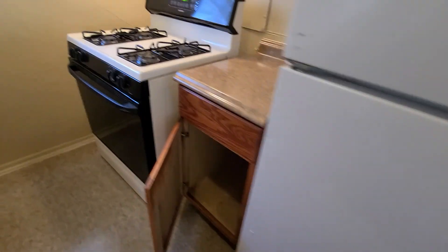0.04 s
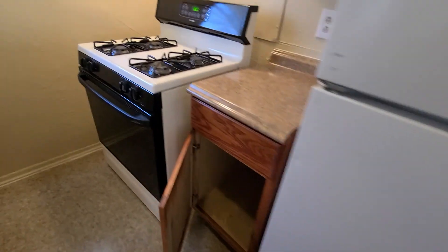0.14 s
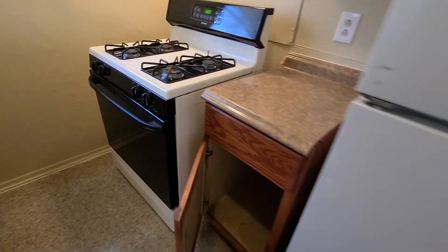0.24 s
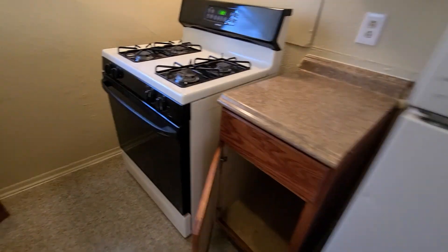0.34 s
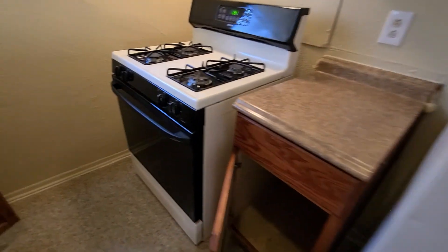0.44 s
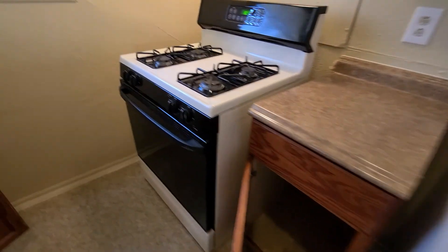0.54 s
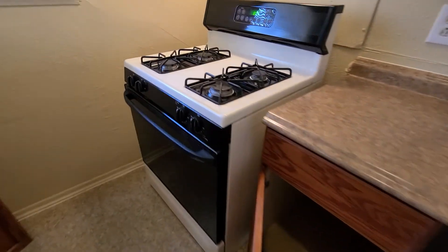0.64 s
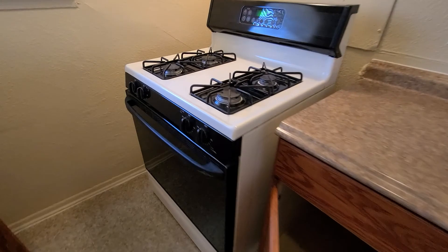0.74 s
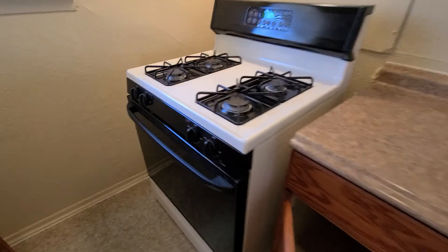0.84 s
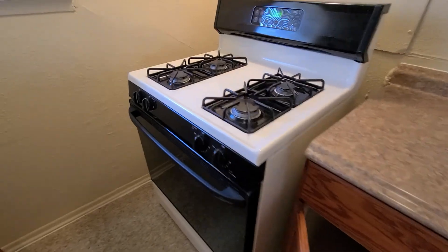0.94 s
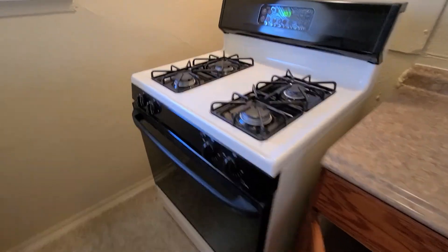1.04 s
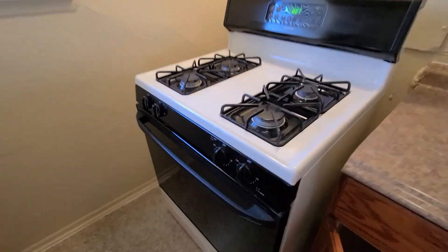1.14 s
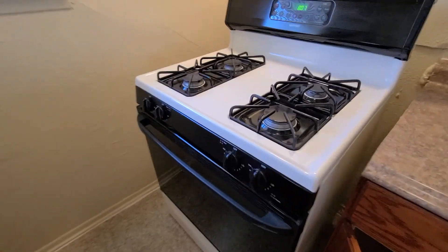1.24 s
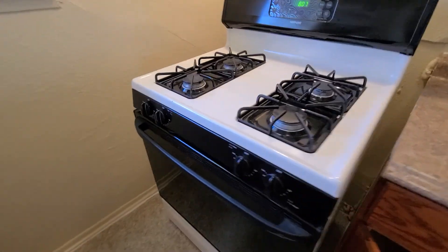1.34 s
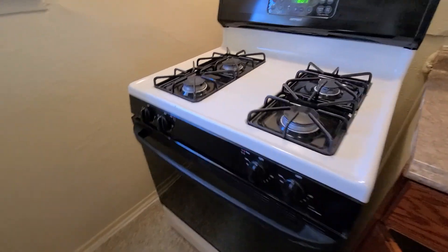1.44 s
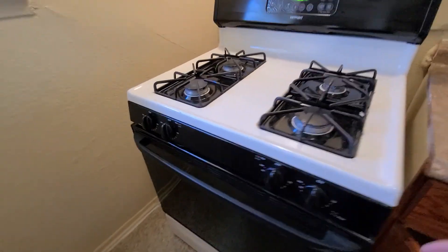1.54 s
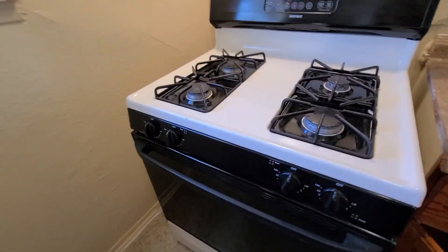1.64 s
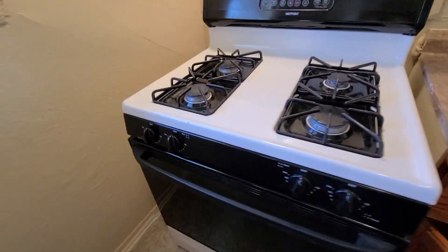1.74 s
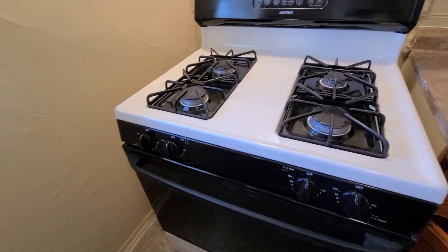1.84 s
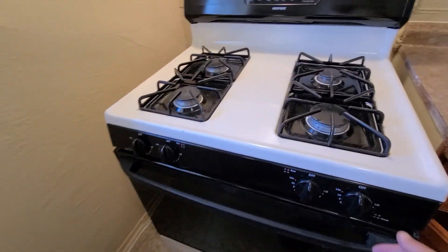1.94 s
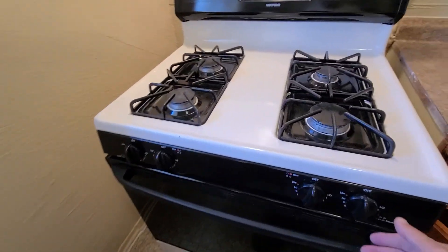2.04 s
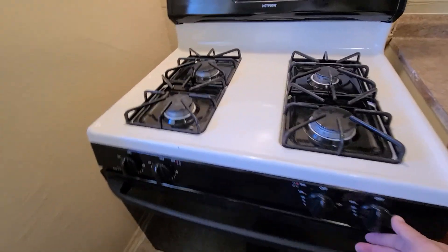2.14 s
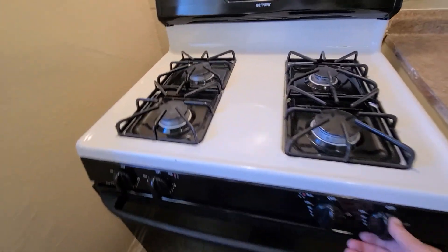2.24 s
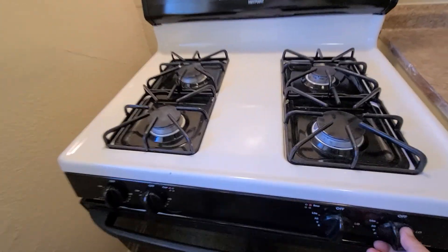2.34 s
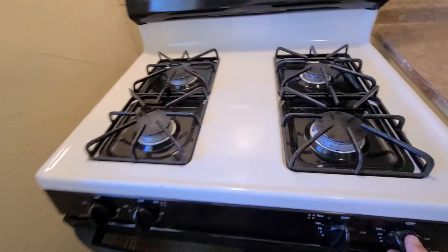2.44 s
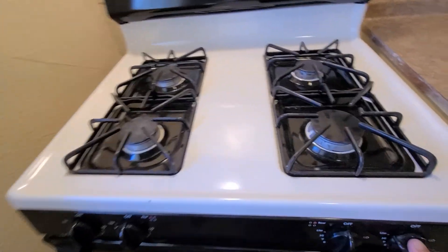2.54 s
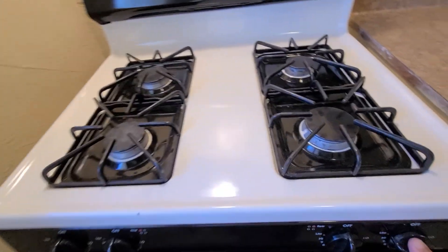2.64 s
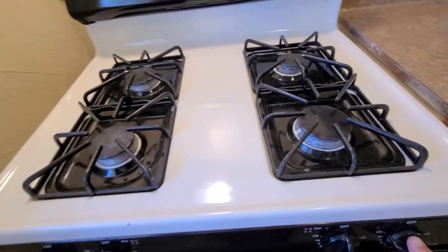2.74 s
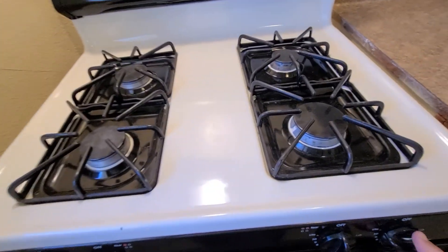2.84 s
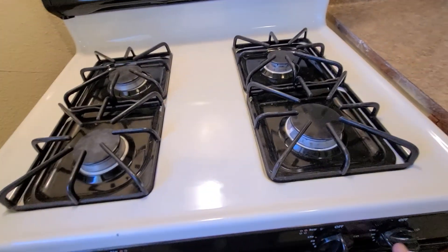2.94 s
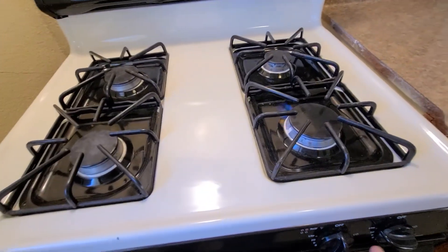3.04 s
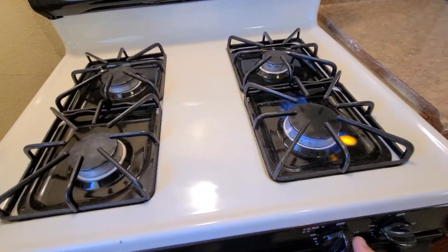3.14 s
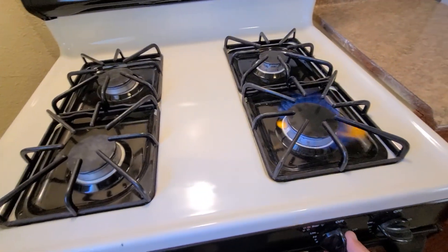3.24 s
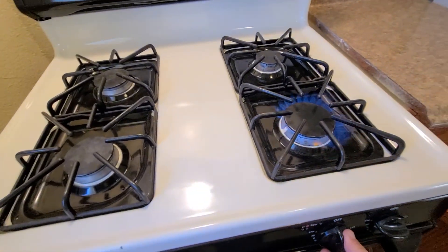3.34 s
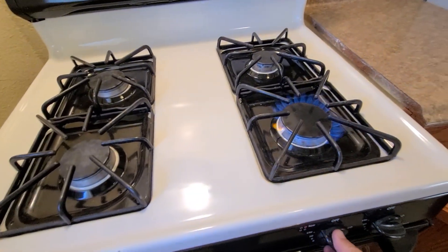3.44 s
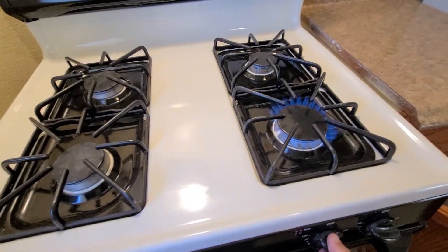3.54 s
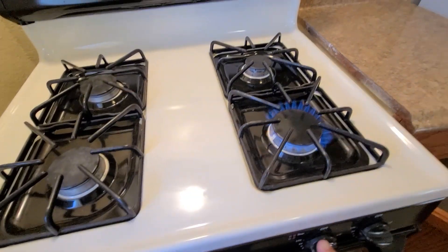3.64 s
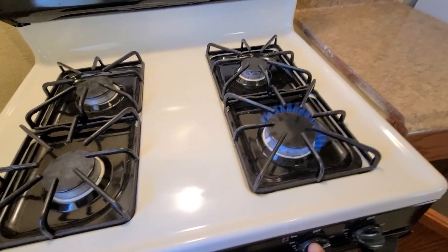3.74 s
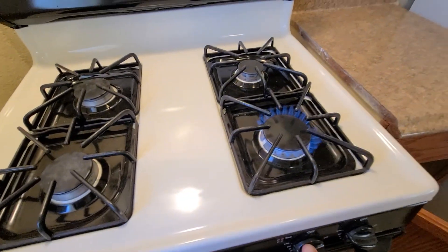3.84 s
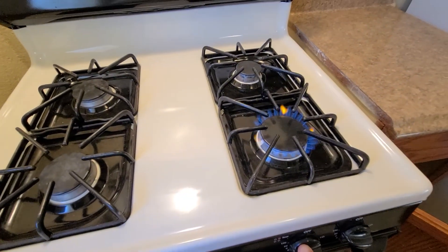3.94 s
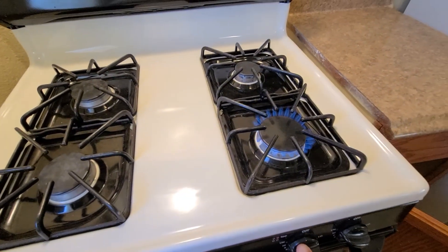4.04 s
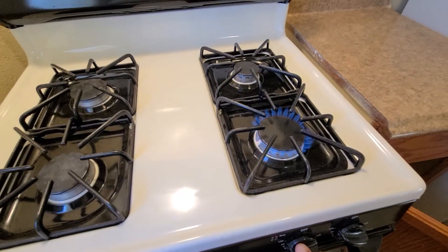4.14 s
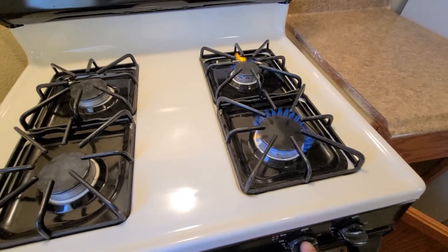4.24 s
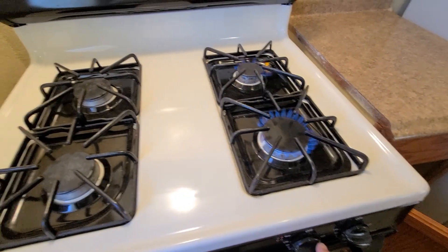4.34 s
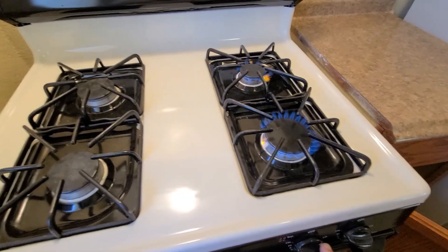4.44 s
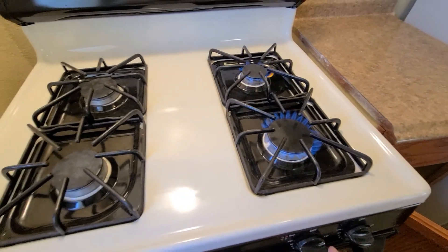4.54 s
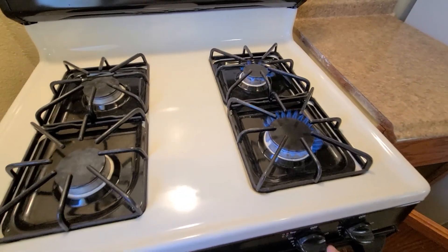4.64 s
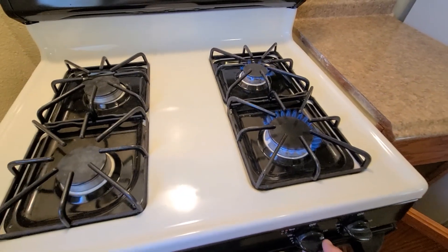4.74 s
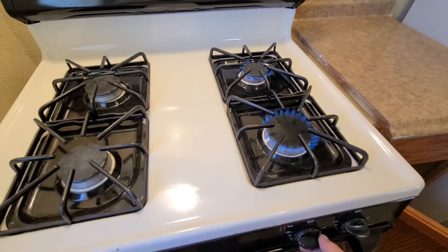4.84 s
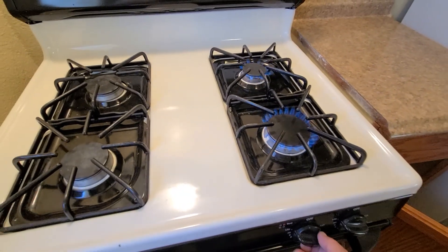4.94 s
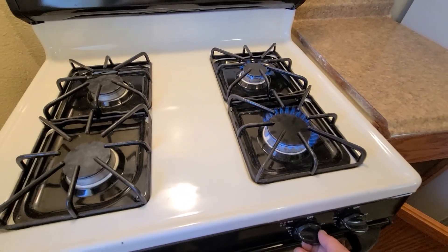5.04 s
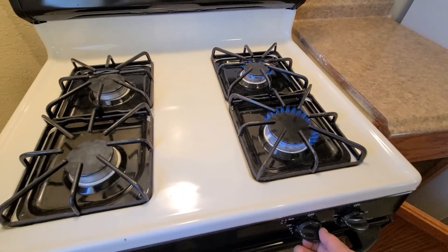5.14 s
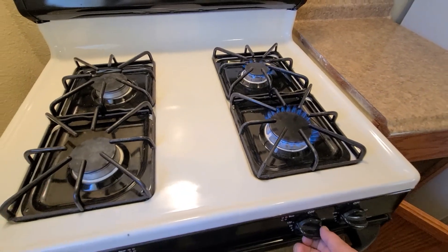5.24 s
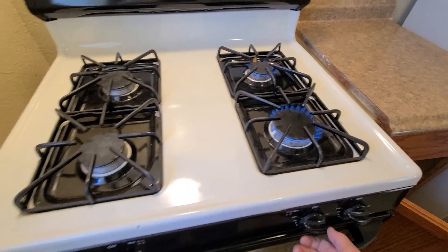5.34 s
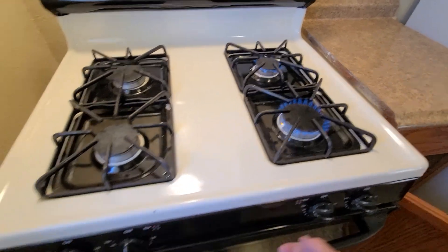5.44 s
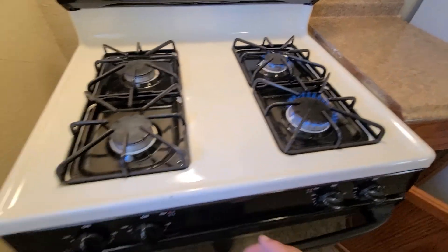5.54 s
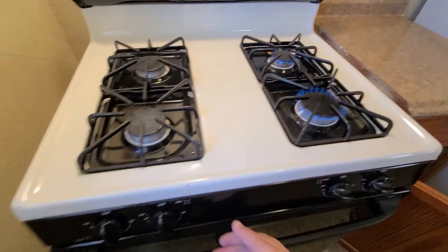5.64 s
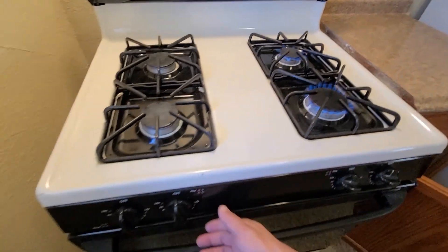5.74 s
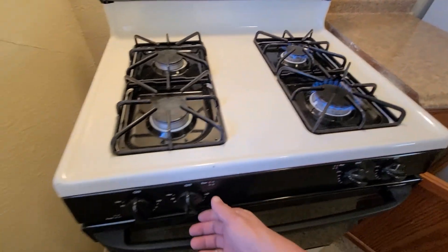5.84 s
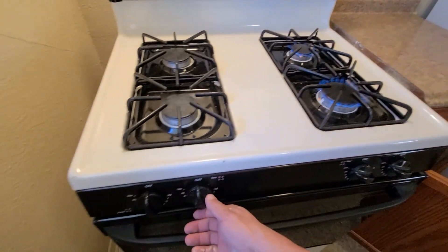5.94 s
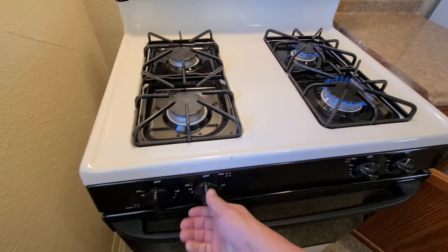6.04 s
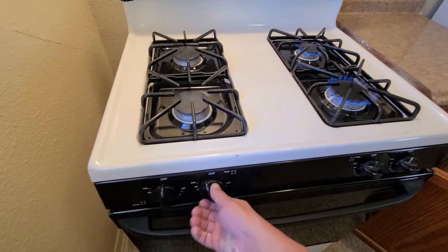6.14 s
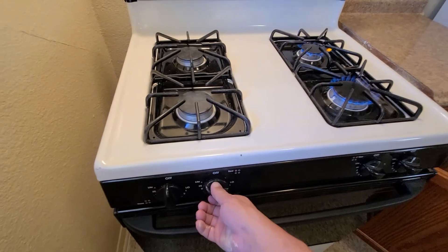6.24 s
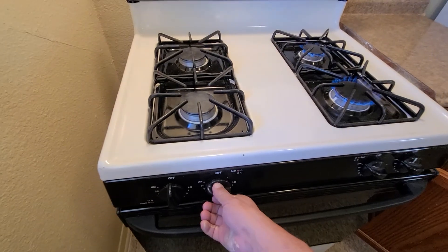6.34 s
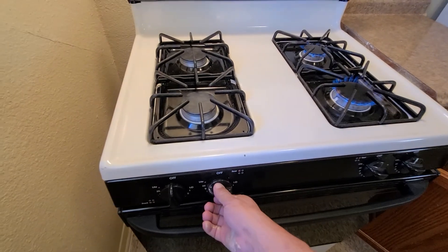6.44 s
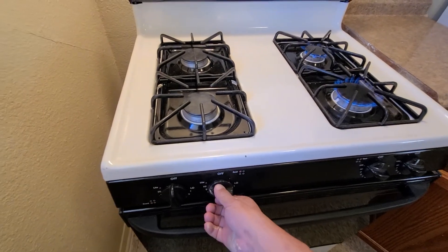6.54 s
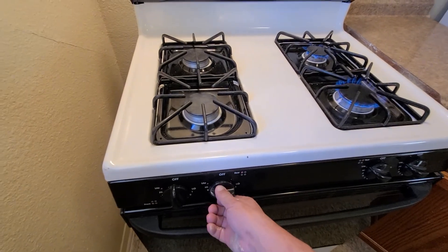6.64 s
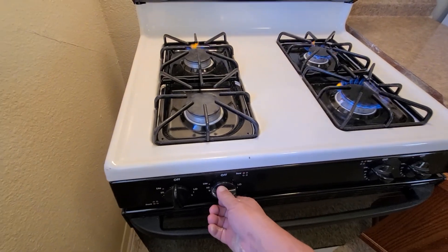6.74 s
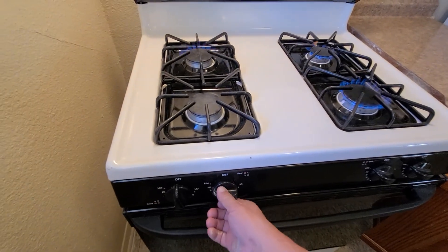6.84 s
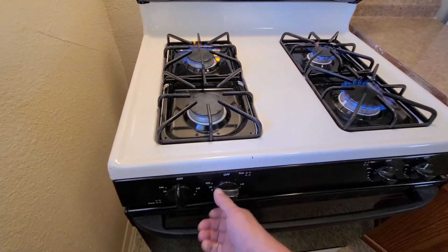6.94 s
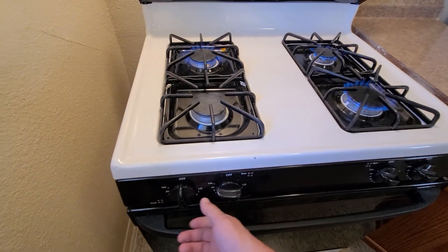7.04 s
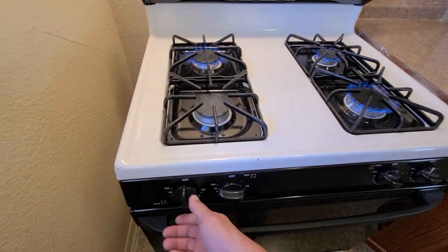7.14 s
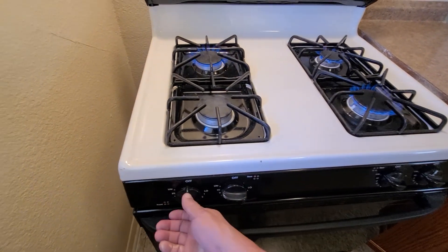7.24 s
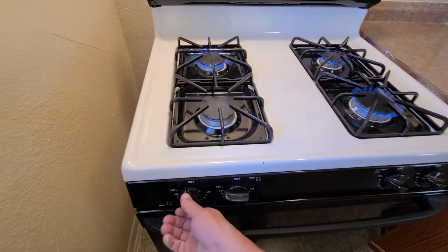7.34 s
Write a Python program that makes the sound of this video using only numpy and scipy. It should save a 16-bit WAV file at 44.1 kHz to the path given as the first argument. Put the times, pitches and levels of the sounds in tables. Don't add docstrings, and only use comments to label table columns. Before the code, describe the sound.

Close handheld stereo sound of a gas range being lit. First only fridge hum, airy fan noise and light shoe scuffs; then a metallic knob knock and stem squeaks. Dry, piercing spark clicks follow at a regular quick pace until the end, mostly toward the left, ringing on metal and bouncing off hard walls, with subdued gas hiss.

```python
import sys
import numpy as np
from scipy import signal
from scipy.fft import rfft, irfft, next_fast_len
from scipy.io import wavfile
from scipy.ndimage import uniform_filter1d

SR = 44100
rng = np.random.default_rng(int(sys.argv[2]) if len(sys.argv) > 2 else 0)


def transcribe(signal):
    frames = np.atleast_2d(signal).T
    limited = np.clip(frames, -1, 1)
    pcm = np.round(limited * 32767).astype(np.int16)
    wavfile.write(sys.argv[1], SR, pcm)


def makeup_ratio(level_db):
    decades = np.asarray(level_db, float) / 20
    return 10 ** decades


N = 325899

# (frequency [Hz], level [dB], from [s], to [s])
COMPRESSOR_LINES = [(58, -46, 0, 8.4), (116.2, -48, 0, 1.5), (116.4, -57, 1.6, 8.4), (212, -49.5, 3.5, 5.4),
                    (200.5, -50, 6, 7.1), (298.6, -55.5, 1.3, 8.4), (78.4, -60, -1.0, 8.4)]
# (time [s], drone [dB], left-right [dB], motor tone [dB])
FRIDGE_DRONE = [(0.0, -34, 2.5, -47), (0.3, -34.5, -2.5, -72), (1.11, -34, -5.5, -43),
                (1.79, -35.5, -5, -38), (2.59, -31, -1, -36), (2.98, -32.5, 0.5, -34.5),
                (3.3, -33.5, 0.3, -46), (3.55, -32.5, 1.3, -36.5), (4.3, -33, 1, -38), (4.9, -33, 1.1, -35),
                (5.9, -35.5, 0, -46.5), (6.3, -37, 0.5, -60), (7.39, -37.5, -1, -48)]
# (frequency [Hz], width [Hz], level [dB], share of the standing wave's swing)
FRIDGE_TONES = [(59.1, 9.9, -53, .01), (118, 11, -73, .01), (241.6, 8.6, -61.5, 0.78),
                (292.7, 12, -58, 0.15), (364, 36, -50, 0.16), (863.5, 7.1, -56.5, .01),
                (1219, 7.8, -58.5, 0.0092)]
# (frequency [Hz], density [dB per Hz])
RUMBLE_COLOUR = [(10, -11), (22, -29), (40, -8), (52, -11), (62, -18), (75, -1), (100, -35), (140, -67)]
# (time [s], level [dB])
FOOTFALLS = [
    (.12, -46),
    (.66, -49),
    (.9, -45),
    (1.75, -52),
    (2.3, -50),
    (7.39, -45),
]
# (time [s], level [dB])
FLAMES = [
    (3.18, -45.5),
    (4.28, -70),
    (7.0, -53),
]
# (frequency [Hz], density [dB per Hz])
FAN_COLOUR = [(65, -15), (110, -2.5), (119, -10.5), (148, -5.5), (236, -4.5), (313, -8.5), (454, -5.5),
              (527, -10.5), (840, -13), (1110, -19), (1840, -20), (2530, -27), (5130, -37), (9500, -72),
              (12400, -104), (20900, -120)]
# (frequency [Hz], left-right [dB])
FAN_SIDES = [(60, -18), (110, 2.5), (200, -3.5), (380, -1), (700, -2.5), (1290, 6), (2380, -1), (4400, 2),
             (8120, 34), (15000, 12)]
# (frequency [Hz], likeness)
LIKENESS = [(25, 0.88), (60, 0.97), (130, 0.85), (290, 0.88), (640, 0.37), (1410, -1.14), (3100, 0.29),
            (6820, -1.1)]
# (time [s], level [dB])
CORNER_AIR = [
    (.35, -6),
    (2.1, 3.5),
]
# (frequency [Hz], density [dB per Hz])
HISS_COLOUR = [(1500, -10.5), (3000, -3), (5000, -5), (7500, -4), (9500, -3.5), (12000, -21), (16000, -36)]
# (frequency [Hz], left-right [dB])
HISS_SIDES = [(2000, 1), (4000, 1.5), (6300, 16), (8000, 6), (10000, 0), (15000, 5)]

# (time [s], length [s], level [dB], brightness [dB per octave])
CLOTH = [(.217, 0.086, -59.5, -9.5), (.611, 0.017, -51.5, -4), (.635, 0.064, -56, -2.5),
         (.73, 0.055, -53, 0), (.772, 0.043, -60, -1), (.861, 0.056, -55, -2)]
SOLE = [(1.044, 0.041, -39.5, 0.1), (1.084, 0.002, -53, 6), (1.156, 0.012, -74, 14)]
DRAG = [(.854, 0.46, -43.5, 0.1)]
FINGERS = [(2.226, 0.026, -41.5, 7.6), (2.25, 0.055, -38, 1.2), (2.297, 0.079, -51, .1),
           (2.402, 0.12, -54, 1.3), (2.561, 0.081, -48, 1.8), (6.1025, 0.005, -44, 2),
           (6.113, 0.033, -39, 1.3333)]
STEM_RUB = [(3.46, 0.073, -30, -1)]
PALM = [(3.426, 0.025, -45, -6), (6.117, 0.029, -42, 2)]
# (frequency [Hz], density [dB per Hz])
CLOTH_COLOUR = [(1100, -16), (1600, -4), (4800, -7.5), (6200, -2), (7500, -8.5), (8600, -15), (15000, -27),
                (16500, -40)]
SOLE_COLOUR = [(380, -21), (550, -6.5), (1900, -3.5), (3200, 1.5), (4800, -14.5), (8300, -29.5),
               (10500, -26), (16000, -42)]
DRAG_COLOUR = [(900, -21), (1400, 1.5), (1900, -1), (2600, -6), (4000, -17), (9000, -64)]
FINGER_COLOUR = [(380, -16), (600, 18), (2200, -14), (3100, 3), (5000, -7), (6800, -24), (12500, -27),
                 (15500, -32)]
STEM_COLOUR = [(420, -9), (680, -9), (1400, -32), (1480, 3.5), (1570, -30), (2450, -22), (2620, -5),
               (3300, -34)]
PALM_COLOUR = [(450, 0), (700, -3), (1000, -10), (1250, -5), (1700, -30), (6000, -60)]

SQUEAK_TIMES = [3.4205, 4.229, 4.272, 2.25, 3.427, 3.4285, 3.419, 3.499, 2.263, 3.4423, 3.4555, 3.474, 4.4,
                2.911, 3.423, 3.2, 6.0998, 6.1005, 6.101, 2.2325, 2.235, 2.241]
# (level [dB], frequency [Hz], t60 [s])
SQUEAK_RINGS = [(-39, 650, .034), (-36, 1300, .02), (-35.5, 1250, 0.031), (-43, 3000, 0.14),
                (-36, 1465, .08), (-31, 2600, .05), (-37, 2700, .05), (-41, 1480, .04), (-35, 1500, .04),
                (-33, 1465, .07), (-28.5, 1300, .05), (-36, 2000, 0.031), (-46, 1300, .08),
                (-42, 2950, 0.055), (-36, 2900, .05), (-47, 2600, .05), (-32.5, 3120, 0.022),
                (-33.5, 5010, .016), (-39, 6700, .012), (-31, 4300, .015), (-26, 1550, .04),
                (-37, 2900, .04)]
SLIP_TIMES = [3.483, 3.409, 3.447, 2.2395, 2.252, 2.24, 2.284, 2.308, 6.108, 1.0655, 1.084, 2.2328, 2.365,
              2.385]
# (level [dB], frequency [Hz], t60 [s])
SLIP_RINGS = [(-34, 1490, .06), (-32, 2920, .03), (-35, 2900, .04), (-32, 3000, .02), (-37, 3200, .05),
              (-38, 5000, .03), (-43, 3000, .05), (-40, 1900, 0.028), (-44, 3400, .04), (-46, 2600, .01),
              (-52, 5000, .006), (-39, 6300, 0.0091), (-48, 2900, .06), (-48, 3150, .06)]
# (time [s], peak [dB], left-right [dB], brightness [dB per octave], share of the hollow ring [dB])
KNOCKS = [(2.215, -42, -2.5, 5, -2), (2.2326, -22.5, 10, 4, -8.5), (2.307, -44.5, -1, -4, 0),
          (2.8374, -57, 9, -12.5, -12), (3.4205, -36, -5, -3.5, -13), (3.432, -41, 8, 5, 2),
          (3.4994, -43, -3, -7, -4.5), (4.2288, -46.5, 7, 0, -2.5), (4.2722, -51, 11, -2, -6),
          (4.3206, -53, 0, -8, -3), (6.1, -36, -4, -2, -10), (6.802, -46.5, 12, 8, -5)]
# (frequency [Hz], level [dB], t60 [s])
PANEL_MODES = [(702, 1, 0.041), (714, -39, 0.013), (1024, -5, 0.025), (1304, -14, 0.13), (1480, -14, 0.074),
               (1460, -33, 0.035), (2080, -16, 0.019), (2100, -28, 0.038), (2760, -7.5, 0.035),
               (3050, -27, 0.088), (2960, -8, 0.068), (3230, 2, 0.016), (3870, -1.5, 0.0058),
               (4580, -7, 0.016), (5140, -12, 0.018), (6700, -21, 0.0056), (9000, -27, 0.0032)]

# (frequency [Hz], early t60 [s], late t60 [s], left [dB], right [dB])
KITCHEN = [(680, 0.17, 0.99, -10, 19), (1090, 0.17, 0.5, -14, -4.5), (1430, 0.24, 0.5, 3, -4),
           (3080, 0.22, 0.7, 8.5, 8), (4060, 0.23, 0.51, 2, 4), (6020, 0.28, 0.72, 8.5, -14.5),
           (7440, 0.24, 0.61, 8.5, -5.5), (8870, 0.28, 0.53, -3.5, -6.5), (11100, 0.2, 0.42, 1, 10),
           (13500, 0.21, 0.29, 2, -18), (16000, 0.17, 0.33, 14, 4)]
# (time [s], brightness [dB per octave], middle [dB], top [dB])
TURNING = [(2.6, 1, 2, -10), (3.0, 1, 1, -12), (3.3, 1, 1, -2), (3.7, 1, -0.3, -4), (4.3, 1.3, 1.5, -1.5),
           (4.8, 0.6, -1.5, -6), (5.2, 1, -2, 0.5), (5.9, 1, 0, -5), (6.3, 0.5, -1, -6), (6.7, 0, 1, 2),
           (7.2, 0, -2.5, 5)]
# (frequency [Hz], density [dB per Hz])
KNOCK_ECHO = [(290, -26), (500, 7), (679, -3), (1130, 24), (1450, 22.5), (2160, 1.5), (2710, 14.5),
              (4090, -10), (5060, -2), (12000, -57), (15600, -73), (22000, -120)]

# (time [s], peak [dB], left-right [dB], thin crack of a gap in plain sight [dB],
# brightness [dB per octave])
SPARKS = [(2.659, -6, 2, -28, -10), (2.909, -17, -14.5, 1, -18), (3.159, -4.5, 3, -27, -12),
          (3.409, -5, 11.5, -24, -3.5), (3.659, -7, 5.5, -31, -5), (3.9094, -5, 10.5, -16, -3),
          (4.1591, -2, 8, -30, 0), (4.409, -3, 10, -29, 3), (4.6593, -1.5, 10, -28, 3),
          (4.9092, -7, 15, -31, -1.5), (5.1595, -5.5, 11.5, -25, -6), (5.4098, -6.5, 8, -31, -0.5),
          (5.6592, -6.5, 11, -27, 1), (5.91, -1.5, 12, -30, 1.5), (6.16, -5, 10, -29, 1.5),
          (6.4102, -3, 9, -33, 3), (6.6603, -2, 9.5, -31, 2.5), (6.9103, -4.5, 8, -23, 4),
          (7.1603, -4.5, 8, -22, -2)]
# (frequency [Hz], density [dB per Hz])
SNAP_COLOUR = [(710, -46), (1200, -12.5), (1710, -10), (2440, -14), (4340, -8.5), (5670, -7.5), (7310, -8),
               (9540, -0.5), (10200, -1.5), (12900, -7.5), (15700, -22.5), (16300, -26), (17000, -7)]
# (frequency [Hz], left-right [dB])
SNAP_SIDES = [(1500, -3.5), (3000, -15.5), (5000, 1), (7000, 9.5), (9500, -11.5), (12000, -18),
              (15500, -8.5)]
SNAP_BODY = [-5.5, -4.5, -4, -0.5, 0.5, 2.5, 5, 7, 5, 0.5, 0, 5, 3.5, -1, -3, -5, 0.5, -5, -7]
# (left [Hz], left [dB], right [Hz], right [dB])
CAPS = [(7500, -10, 8200, 3), (7500, -6, 8700, -5), (5470, -2, 8450, 5), (8200, -15, 11300, 0),
        (6000, -1, 7800, -8), (7900, -10, 11000, -5), (5900, -2, 8600, 3), (7040, 4, 7400, 2),
        (6030, 2, 8500, 4), (6060, -1, 7600, -5), (8000, 0, 8800, 1), (8100, 0, 9700, 0),
        (8000, -9, 10600, 3), (9700, 3, 9300, -4), (7450, -9, 9500, 3), (7600, 1, 13000, 2),
        (7700, 0, 11000, 0), (6450, 1, 11000, -4), (9600, 13, 9600, -6)]
# (left [Hz], left [dB], right [Hz], right [dB])
GRATES = [(4350, 10, 2850, 1), (5300, -3, 2960, 5), (5300, -6, 2960, 6), (4710, -1, 3000, 1),
          (5300, -3, 4860, 1), (5150, -4, 5100, 2), (5300, -4, 4400, 0), (5270, -9, 4910, 6),
          (5300, -8, 3300, -7), (5280, 2, 3200, 2), (5230, -4, 2700, 3), (5260, 3, 3150, -2),
          (5300, 3, 4300, 10), (5260, 0, 5900, 9), (5280, 1, 2860, -2), (5270, 1, 2890, -4),
          (5260, -2, 2800, -1), (4590, -3, 3500, 7), (4600, -5, 3300, -1)]
# (left at 3.4 kHz [dB], right at 5.7 kHz [dB], left top [dB], right top [dB])
SHADING = [(5, 8, 5, 2), (0, 2, 0, 0), (-3, 0, 5, -2), (-6, -7, 9, -2), (0, 8, 7, 1), (-1, 1, -1, 2),
           (0, 7, -5, -2), (-1, 5, -1, -1.5), (5, 8, -1, 0), (1, 2, 1, 0), (-1, 1, 8, 2), (-1, 2, 5, -5),
           (2, 1, 2, -1), (6, 1, 6, 0), (7, -5, 2, 0), (9, 2, 3, -9.5), (7, -6, 1, -3.5), (6, 1, 4, -7),
           (4, -8, 6, -1)]
FAR_GAPS = [-8, -12, -6, -9, -10, -14, -12, -1.5, -3, 3, 0, -14, -10, -6, -14, -8, -24, -12, -12]
# (frequency [Hz], width [Hz], added [dB])
HOLLOWS = [
    [(1490, 230, -0.5), (6000, 370, -5.5), (7950, 320, -4), (9300, 500, -21)],
    [(1400, 240, -8), (3230, 470, -1.5), (8700, 440, -5), (9800, 500, -11)],
]
SCATTER_LENGTH = [
    [0.0017],
    [0.00085],
]
# (delay [s], level [dB])
BOUNCES = [
    (.0032, -24),
    (.0082, -5),
]

# (frequency [Hz], width [Hz], added [dB])
CAVITIES = [
    (7360, 1600, -9.5),
    (8830, 810, -3.5),
]


def rms_one(x):
    return x / np.sqrt(np.mean(x ** 2) + 1e-20)


def in_time(rows):
    s, *columns = np.transpose(rows)
    return [np.interp(np.arange(N) / SR, s, c) for c in columns]


def at_hz(points, hz, column=1):
    points = np.array(points)
    return np.interp(np.log(hz + 1), np.log(points[:, 0] + 1), points[:, column])


def sides(pan_db):
    return makeup_ratio(np.array([pan_db / 2, -pan_db / 2]))


def ramp(s, start_s, takes_s):
    return np.clip((s - start_s) / max(takes_s, .01), 0, 1)


def waver(rate):
    knots = rng.standard_normal(64)
    return np.interp(np.arange(N) / SR * rate, np.arange(64), knots)


def swells(rows, length):
    t = np.arange(N) / SR
    return sum(makeup_ratio(db) * np.exp(-((t - s) / (.5 * length)) ** 2) for s, db in rows)


def coloured(spectrum):
    size = next_fast_len(N)
    hz = np.fft.rfftfreq(size, 1 / SR)
    mid, side = rfft(rng.standard_normal((2, size)))
    alike = np.clip(at_hz(LIKENESS, hz), 0, 1)
    pair = np.sqrt(1 + alike) * mid + np.sqrt(1 - alike) * side * [[1], [-1]]
    return rms_one(irfft(pair * spectrum(hz), size)[:, :N])


def resonance(x, hz, width_hz):
    r = np.exp(-np.pi * width_hz / SR)
    poles = [1, -2 * r * np.cos(2 * np.pi * hz / SR), r * r]
    return signal.lfilter([(1 - r * r) / 2, 0, (r * r - 1) / 2], poles, x)


def hump(hz, centre_hz, width_hz, added_db):
    return 1 + makeup_ratio(added_db) / np.sqrt(1 + (2 * (hz - centre_hz) / width_hz) ** 2)


def treble(hz):
    return 1 / (1 + (11000 / hz) ** 12)


def causal(gain):
    cepstrum = irfft(np.log(gain + 1e-9))
    half = cepstrum.shape[-1] // 2
    cepstrum[..., 1:half] *= 2
    cepstrum[..., half + 1:] = 0
    return np.exp(rfft(cepstrum))


def compressor():
    t, fade_s = np.arange(N) / SR, 0.25
    out = np.zeros(N)
    for hz, db, start, end in COMPRESSOR_LINES:
        heard = ramp(t, start, fade_s) - ramp(t, end, fade_s)
        out += np.sqrt(2) * makeup_ratio(db) * heard * np.sin(2 * np.pi * hz * t)
    return out


def fridge():
    drone_hz, motor_hz, motor_db = 90.8, 239.4, -52
    level_db, pan_db, standing_db = in_time(FRIDGE_DRONE)
    t, swing_db = np.arange(N) / SR, standing_db + 42.0
    drone = np.sqrt(2) * makeup_ratio(level_db) * np.sin(2 * np.pi * drone_hz * t) * sides(pan_db)
    whine_db = motor_db + swing_db + 2.1 * waver(8.7)
    out = drone + np.sqrt(2) * makeup_ratio(whine_db) * np.sin(2 * np.pi * motor_hz * t)
    white = coloured(np.ones_like)
    for hz, width_hz, tone_db, share in FRIDGE_TONES:
        tone = resonance(resonance(white, hz, width_hz), hz, width_hz)
        out = out + makeup_ratio(tone_db + share * swing_db) * rms_one(tone)
    return out


def rumble(flames):
    heave = makeup_ratio(-46 + 1.5 * waver(16)) + swells(FOOTFALLS, 0.067) + flames
    return heave * coloured(lambda hz: makeup_ratio(at_hz(RUMBLE_COLOUR, hz)))


def fan_air(flames):
    t = np.arange(N) / SR
    level_db, shaded_db = -39, -43
    fan_db = level_db + (shaded_db - level_db) * ramp(t, 2.53, 0.5)
    fan = makeup_ratio(fan_db + 3) * coloured(lambda hz: makeup_ratio(at_hz(FAN_COLOUR, hz)) * sides(at_hz(FAN_SIDES, hz)))
    corner_db = sum(db * np.exp(-((t - s) / (.5 * 0.64)) ** 2) for s, db in CORNER_AIR)
    fan = fan + (makeup_ratio(corner_db) - 1) * resonance(fan, 362, 180)
    fan = fan + makeup_ratio(45.5) * flames * resonance(fan, 580, 370)
    low = makeup_ratio(np.where(t < 0.56, 2, -3.5))
    return fan + (low - 1) * resonance(fan, 139, 84)


def gas_hiss():
    opening = ramp(np.arange(N) / SR, 2.595, 0.096)
    valve = opening * makeup_ratio(-49 + 1.2 * waver(2.26))
    return valve * coloured(lambda hz: makeup_ratio(at_hz(HISS_COLOUR, hz)) * sides(at_hz(HISS_SIDES, hz)))


def air():
    flames = swells(FLAMES, 0.22)
    return rumble(flames) + fan_air(flames) + gas_hiss()


def scuffs():
    half, grain_db = SR // 5, 4.5
    out, t = np.zeros((2, N)), np.arange(-half, half) / SR
    hz = np.fft.rfftfreq(len(t), 1 / SR)
    rubs = [(CLOTH, CLOTH_COLOUR, 32.5), (SOLE, SOLE_COLOUR, -28.5), (DRAG, DRAG_COLOUR, -1.5),
            (FINGERS, FINGER_COLOUR, 7), (STEM_RUB, STEM_COLOUR, 2.5), (PALM, PALM_COLOUR, 8)]
    for rows, colour, pan_db in rubs:
        for s, length, level_db, bright_db in rows:
            grains = rng.standard_normal((2, len(t))) * makeup_ratio(grain_db * rng.standard_normal(len(t)))
            tilt_db = bright_db * np.log2(np.clip(hz, 500, 9000) / 2000)
            shape = makeup_ratio(at_hz(colour, hz) + tilt_db) * (hz > 300)
            rub = rms_one(irfft(rfft(grains) * shape, len(t)))
            swell = np.exp(-np.abs(t / (.5 * length)) ** 2.5)
            i = round(s * SR) - half
            out[:, i:i + len(t)] += makeup_ratio(level_db) * rub * swell * sides(pan_db)[:, None]
    return out


def stem(times, rows):
    out, t = np.zeros(N), np.arange(SR // 8) / SR
    for s, (level_db, hz, t60), phase in zip(times, rows, rng.random(len(rows))):
        i = round(s * SR)
        envelope = makeup_ratio(level_db - 60 * t / t60) * np.minimum(t * hz / 3.0, 1)
        out[i:i + len(t)] += envelope * np.sin(2 * np.pi * (hz * (i / SR + t) + 0.12 * phase))
    return out * sides(19.5)[:, None]


def knob():
    s, peak_db, pan_db, bright_db, hollow_db = np.transpose(KNOCKS)
    at, out = np.round(s * SR).astype(int), np.zeros((2, N))
    luck_db = 2.2 * rng.standard_normal((len(s), len(PANEL_MODES), 2))
    for k, (hz, level_db, t60) in enumerate(PANEL_MODES):
        strike_db = peak_db + level_db + 1.0 + bright_db * np.log2(hz / 2000) + luck_db[:, k].T
        if 1200 < hz < 1750:
            strike_db = strike_db + hollow_db + 12.0
        clicks = np.full((2, N), 1e-18)
        clicks[:, at] = makeup_ratio(strike_db) * sides(pan_db)
        r, w = makeup_ratio(-60 / (t60 * SR)), 2 * np.pi * hz / SR
        out += (-1) ** k * signal.lfilter([0, np.sin(w)], [1, -2 * r * np.cos(w), r * r], clicks)
    return out


def turned(s, hz):
    times, *columns = np.transpose(TURNING)
    tilt_db, middle_db, top_db = [np.interp(s, times, c, left=0) for c in columns]
    middle = np.exp(-(np.log2(hz / 3600) / 1.25) ** 2)
    return tilt_db * np.log2(hz / 7000) + middle_db * middle + top_db * treble(hz)


def kitchen(sources):
    late_db = -10
    out, edges = np.zeros((2, N)), 420 * 2 ** np.arange(0, 5.5, 1 / 3)
    white = rng.standard_normal((2, 2, N))
    for k, (low, high) in enumerate(zip(edges, edges[1:])):
        hz = np.sqrt(low * high)
        early, late, left_db, right_db = [at_hz(KITCHEN, hz, column=c) for c in range(1, 5)]
        blows = np.full(N, 1e-18)
        for s, level_db, spectrum in sources:
            at = np.round((s + .0015) * SR).astype(int)
            blows[at] += makeup_ratio(level_db + turned(s, hz) + at_hz(spectrum, hz)) ** 2

        def fade(t60):
            return signal.lfilter([1], [1, -makeup_ratio(-120 / (t60 * SR))], blows)

        power = fade(early) + makeup_ratio(late_db) ** 2 * fade(late) - fade(0.019)
        band_filter = signal.butter(2, [low, high], "band", fs=SR, output="sos")
        band = signal.sosfilt(band_filter, white[k % 2])
        out += makeup_ratio(np.array([[left_db], [right_db]])) * band * np.sqrt(np.maximum(power, 0))
    return out


def ringing(hz, row, width_hz):
    left_hz, left_db, right_hz, right_db = row
    return np.array([hump(hz, left_hz, width_hz, left_db), hump(hz, right_hz, width_hz, right_db)])


def sparks():
    out, size = np.zeros((2, N)), 1024
    hz, t = np.fft.rfftfreq(size, 1 / SR), np.arange(size // 4) / SR
    hollows = np.array([np.prod([hump(hz, *row) for row in side], axis=0) for side in HOLLOWS])
    snap = makeup_ratio(at_hz(SNAP_COLOUR, hz)) * sides(at_hz(SNAP_SIDES, hz)) * hollows
    linger = makeup_ratio(-19) * np.exp(-t / 0.0018)
    scatter = np.minimum(t / 0.00024 + 0.13, 1) * (np.exp(-(t / np.array(SCATTER_LENGTH)) ** 2) + linger)
    far = np.exp(-((t - .0021) / 0.00066) ** 2) * [[0], [1]]
    middle = np.exp(-(np.log2((hz + 1) / [[3400], [5700]]) / 0.39) ** 2)
    top = treble(hz + 1)
    crack = np.exp(-((t - .0009) / 0.00013) ** 2) * np.sin(2 * np.pi * 13500 * t) * sides(11.0)[:, None]
    direct, pulse = 1 / (1 + (hz / 2460) ** 4), np.exp(-2j * np.pi * hz * 0.00044)
    fade_out = np.minimum(np.arange(size, 0, -1) / (size / 2), 1)

    def paths():
        return (rng.random((2, len(t))) < .25) * rng.standard_normal((2, len(t)))

    keep, now = 0.75, paths()
    shading = np.array(SHADING)[:, :, None]
    firings = zip(SPARKS, CAPS, SNAP_BODY, shading, FAR_GAPS, GRATES)
    for (s, peak_db, pan_db, crack_db, bright_db), cap, body_db, shade_db, far_db, grate in firings:
        now = keep * now + np.sqrt(1 - keep ** 2) * paths()
        arrivals = rfft(now * (scatter + makeup_ratio(far_db) * far), size)
        even = 1 / np.sqrt(uniform_filter1d(np.abs(arrivals) ** 2, size=19))
        tilt_db = bright_db * np.log2(np.maximum(hz, 6000) / 8000)
        body = makeup_ratio(body_db / (1 + (hz / 2800) ** 4) + tilt_db)
        shade = makeup_ratio(shade_db[:2] * middle + shade_db[2:] * top)
        metal = ringing(hz, cap, 240) * shade * ringing(hz, grate, 140)
        arriving = arrivals * causal(even) * np.sqrt(1 - direct ** 2) + direct * pulse
        burst = irfft(arriving * causal(snap * body * metal)) * fade_out
        i = round(s * SR)
        out[:, i:i + size] += rms_one(burst) * makeup_ratio(peak_db - 14.5) * sides(pan_db)[:, None]
        out[:, i:i + len(t)] += (makeup_ratio(crack_db - 10) + makeup_ratio(-18)) * crack
        blurred = rms_one(signal.lfilter([1, -.7], [1], burst[::-1]))
        for (delay, bounce_db), luck in zip(BOUNCES, rng.standard_normal((len(BOUNCES), 2))):
            j = i + round(delay * (1 + 0.065 * luck[0]) * SR)
            out[:, j:j + size] += blurred * makeup_ratio(peak_db - 25.0 + bounce_db + 1.5 * luck[1])
    return signal.sosfiltfilt(signal.butter(7, 1180, "high", fs=SR, output="sos"), out)


def scene():
    spark_s = np.transpose(SPARKS)[0]
    knock_s, knock_db, _, _, hollow_db = np.transpose(KNOCKS)
    wet = kitchen([(spark_s, -16, SNAP_COLOUR), (knock_s, knock_db + hollow_db, KNOCK_ECHO)])
    wet = wet + makeup_ratio(-4) * resonance(wet, 7720, 600)
    background = compressor() + fridge() + air()
    handling = scuffs() + stem(SQUEAK_TIMES, SQUEAK_RINGS) + stem(SLIP_TIMES, SLIP_RINGS) + knob()
    return background + handling + wet + sparks()


def roll_off(x):
    return signal.sosfilt(signal.butter(12, 17140, fs=SR, output="sos"), x)


def record(dry):
    pairs = zip(dry, CAVITIES)
    x = np.array([side + makeup_ratio(db) * resonance(side, hz, width_hz) for side, (hz, width_hz, db) in pairs])
    dull, overload = 0.32, .84
    x = x + makeup_ratio(-67.5) * signal.lfilter([1 - dull], [1, -dull], rng.standard_normal(dry.shape))
    x = x + makeup_ratio(3) * resonance(x, 15700, 400)
    x = signal.sosfilt(signal.ellip(10, .5, 45, 15850, fs=SR, output="sos"), x)
    x = overload * np.tanh(x / overload)
    x = signal.sosfilt(signal.ellip(10, .5, 60, 16600, fs=SR, output="sos"), x)
    return roll_off(x)


dry = scene()
out = record(dry)
transcribe(out)
```